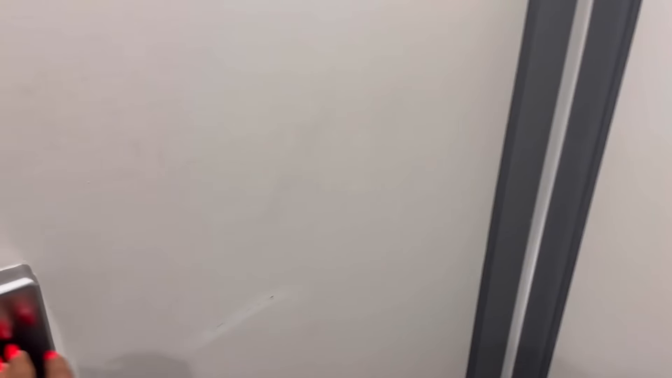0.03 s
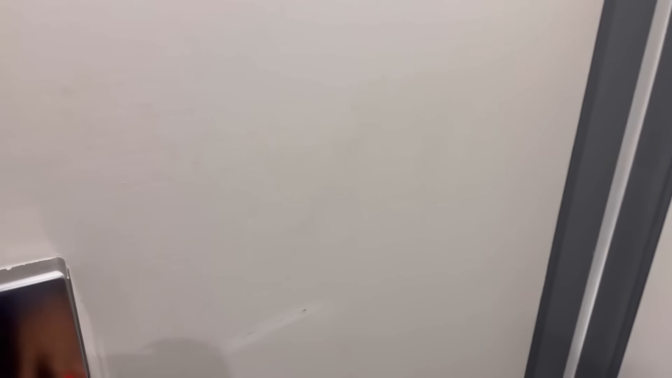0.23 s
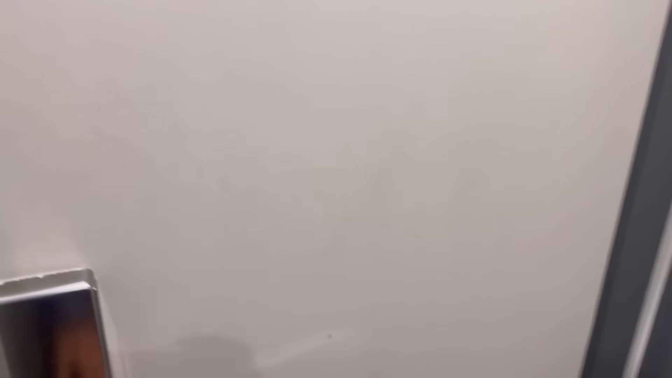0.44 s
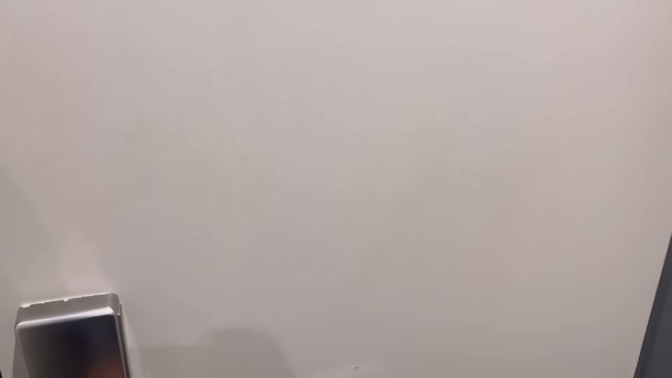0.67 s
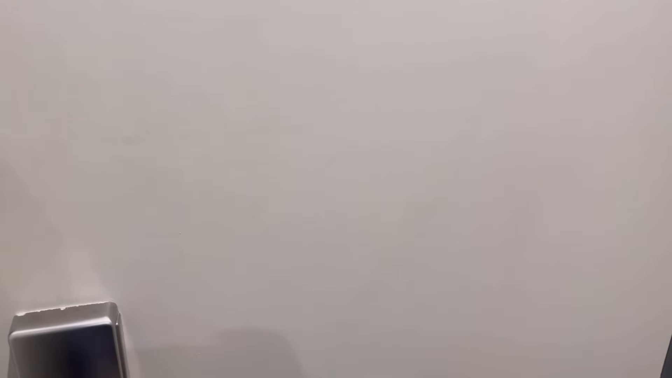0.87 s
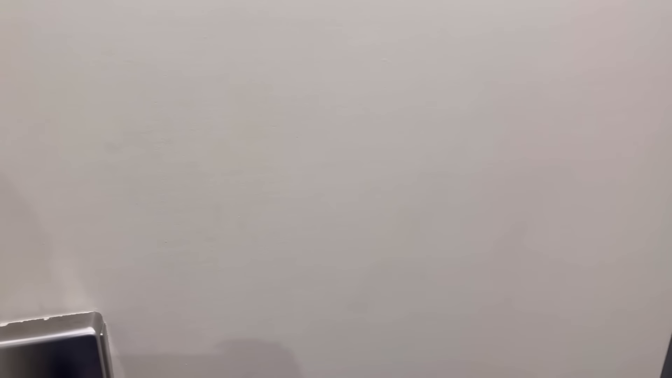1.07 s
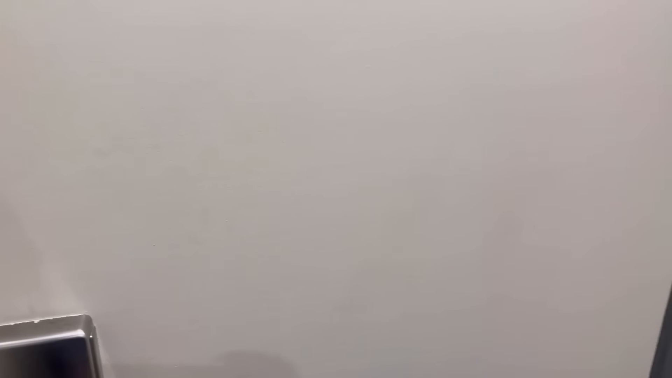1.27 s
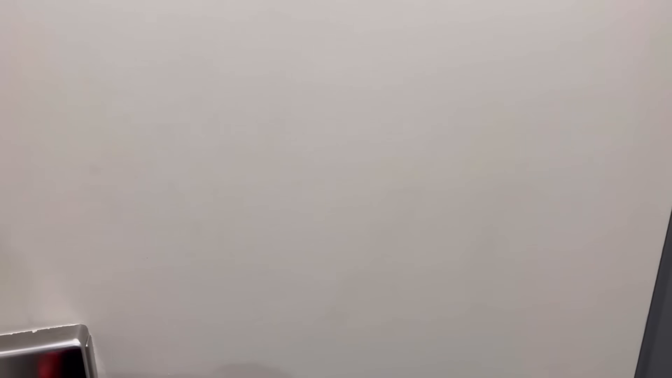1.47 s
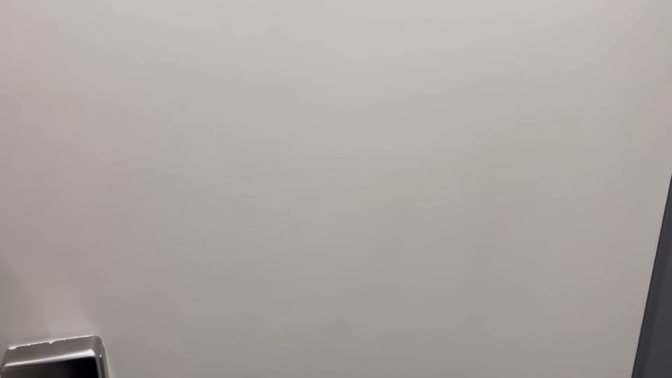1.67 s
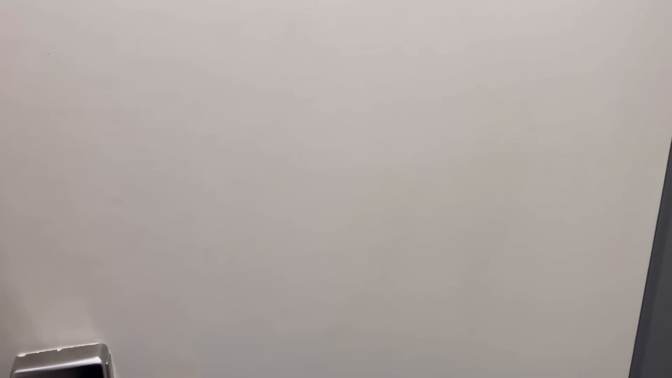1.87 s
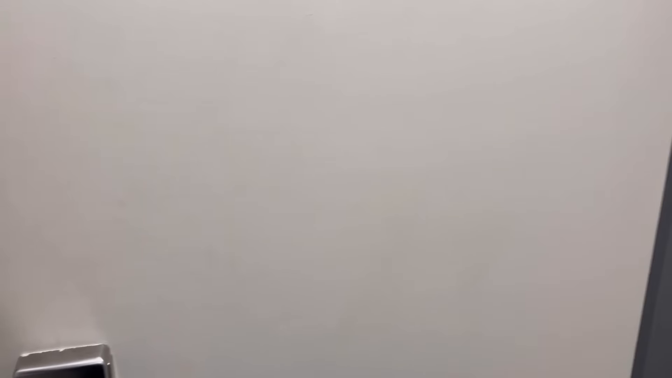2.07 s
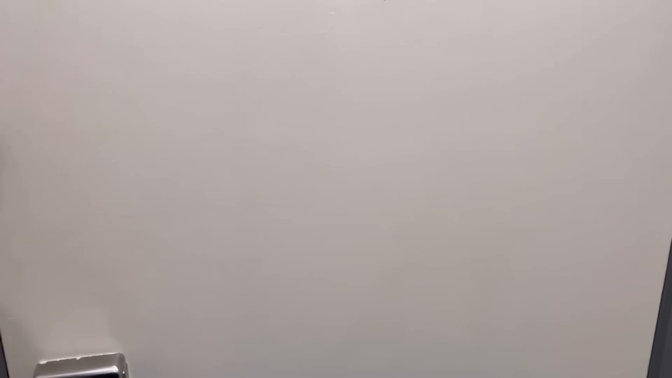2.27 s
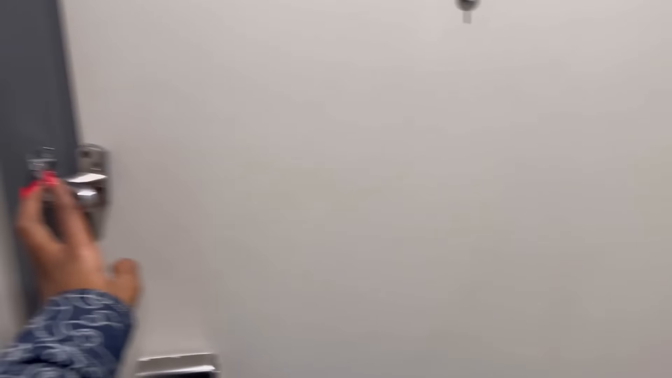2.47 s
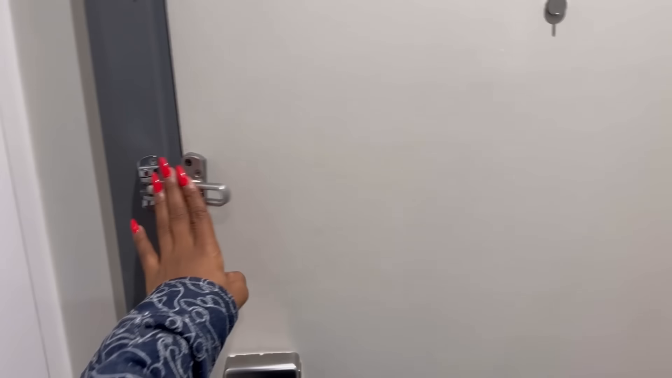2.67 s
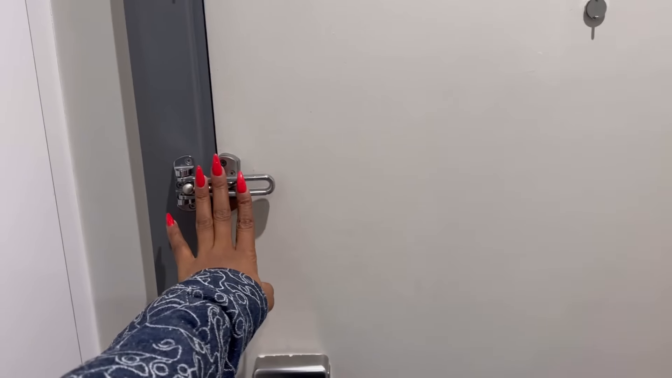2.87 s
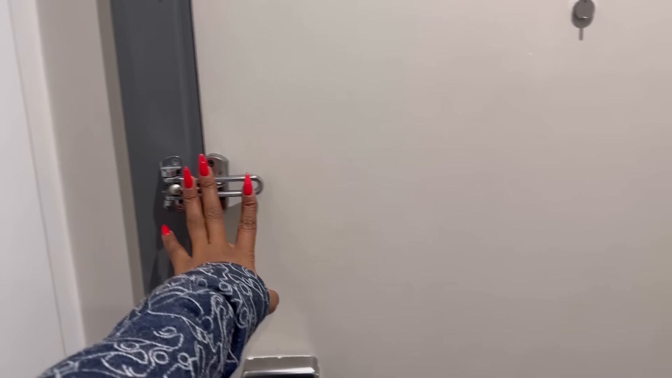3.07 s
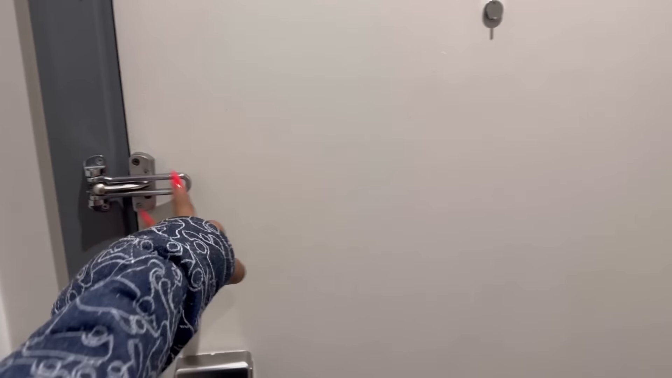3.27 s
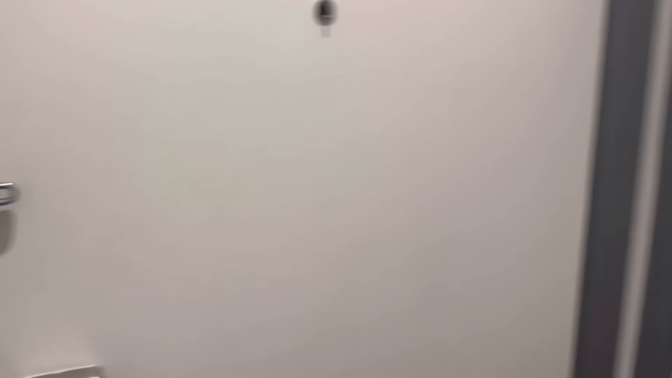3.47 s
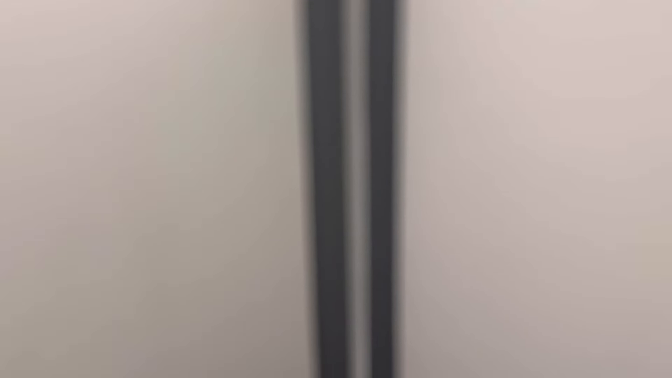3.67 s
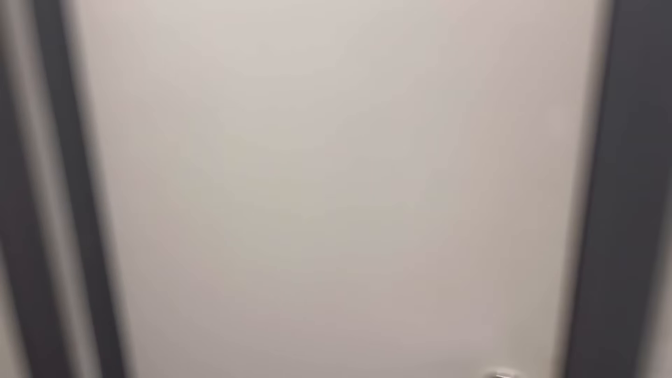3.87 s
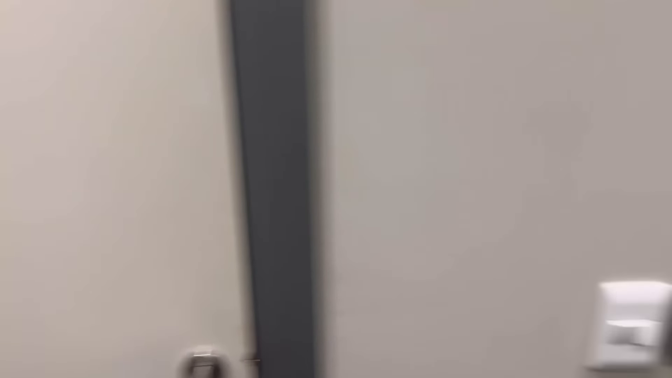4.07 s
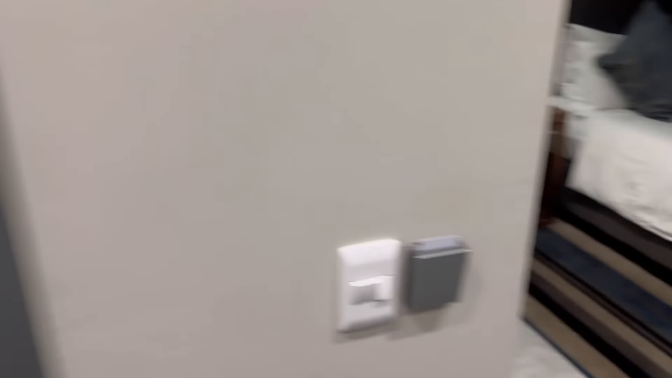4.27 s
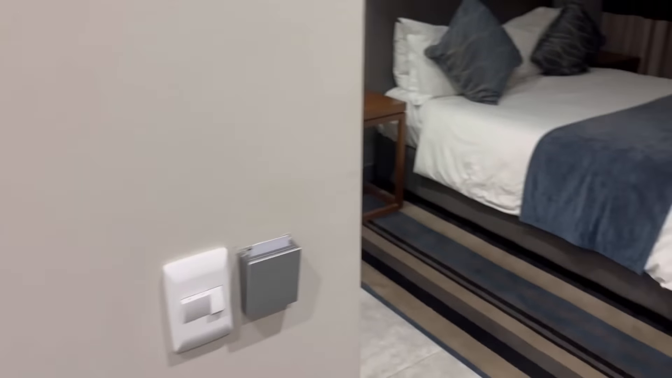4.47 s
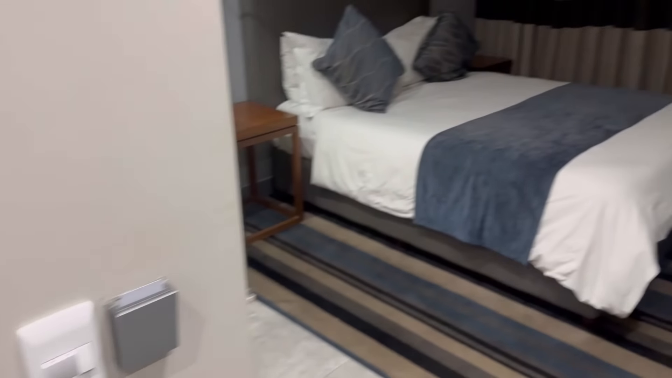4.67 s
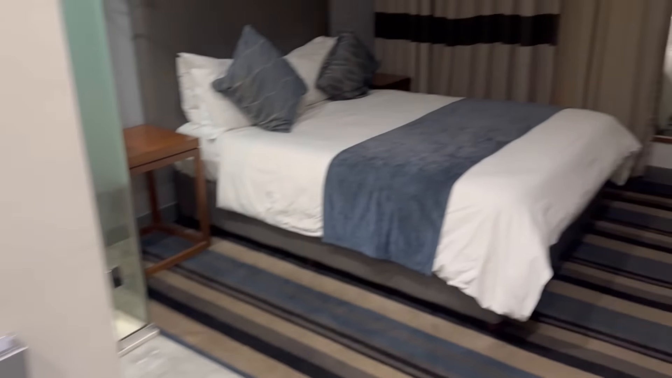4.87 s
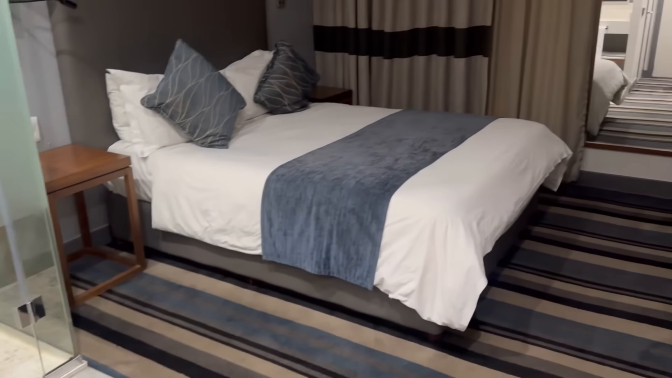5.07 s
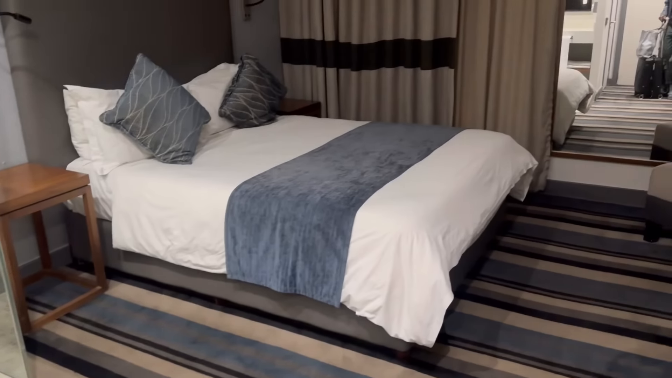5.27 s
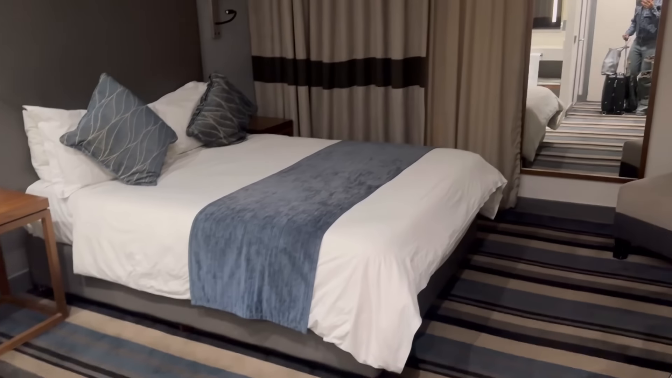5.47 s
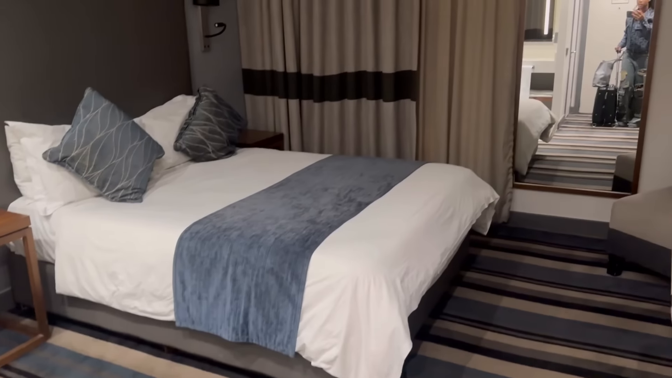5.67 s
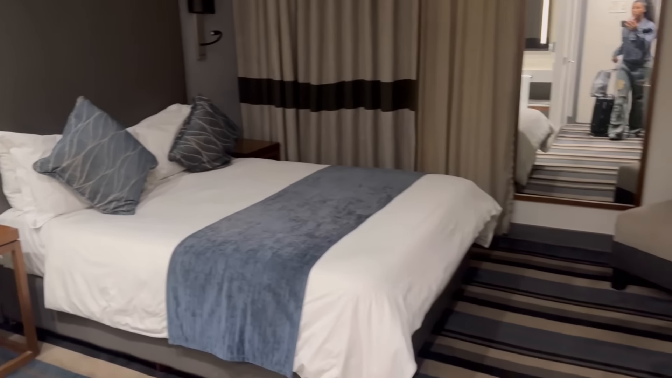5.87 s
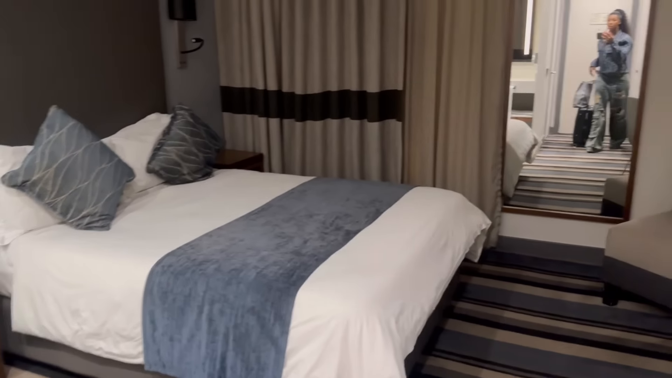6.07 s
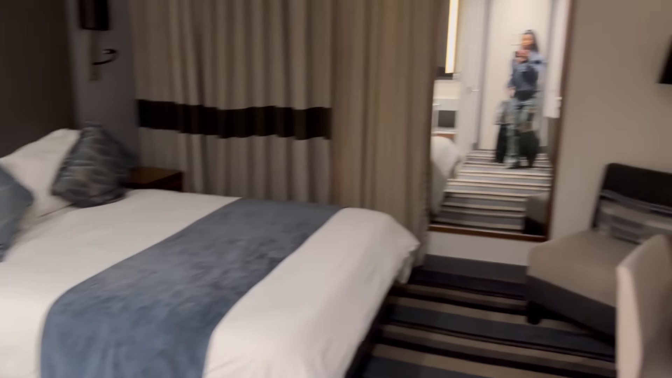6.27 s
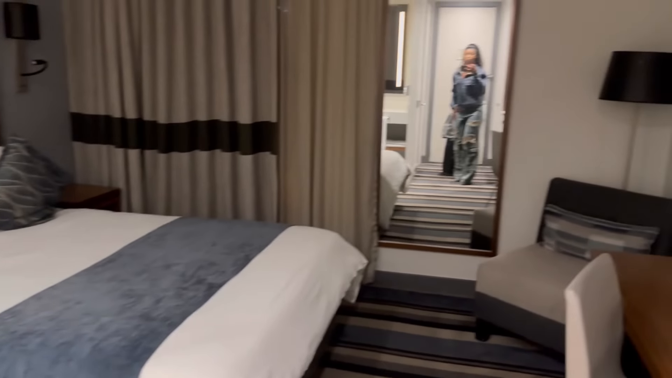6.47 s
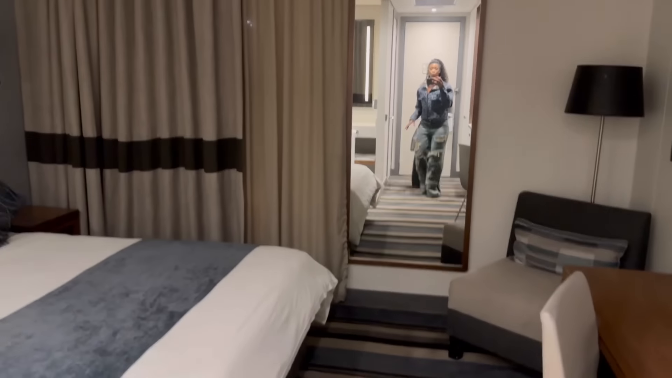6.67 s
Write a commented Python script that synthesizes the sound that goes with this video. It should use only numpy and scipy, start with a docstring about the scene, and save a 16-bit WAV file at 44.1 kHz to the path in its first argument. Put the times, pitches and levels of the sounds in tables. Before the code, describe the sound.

Close to a phone in a small hard entrance passage, a latch snaps sharply, then a heavy room door slams with a deep boom, knocks and rattling metal. Scuffs and rumble settle, thin hinge squeaks chirp, and a metal swing guard knocks and clicks into place. Afterwards it is much quieter: cloth rustle, soft carpet steps, small ticks and a faint wheel whine over steady low air noise.

```python
"""Heavy room door slam

A door latches and slams beside a phone: ticks and knocks are short pushes into banks of metal and door modes.
The leaf booms in one low mode and its latch rattles with it; hinge squeaks are gliding, unsteady tones.
A swing guard is flipped onto its stud. Then soft steps, cloth and a wheeled case move into a carpeted room:
coloured noise swelling with each movement, a faint wheel whine and low hums, over steady air noise."""
import sys
import numpy as np
from scipy import signal
from scipy.fft import rfft, irfft
from scipy.io import wavfile
from scipy.ndimage import uniform_filter1d, map_coordinates

SR = 44100
rng = np.random.default_rng(int(sys.argv[2]) if len(sys.argv) > 2 else 0)


def digitize_waveform(pressure):
    """Quantize a signal to 16-bit integers and store it at the path in sys.argv[1].

    Rows of a 2-D input are taken as channels; values are limited to [-1, 1].
    """
    field = np.atleast_2d(pressure).T
    bounded = np.clip(field, -1, 1)
    quanta = np.round(bounded * 32767).astype(np.int16)
    wavfile.write(sys.argv[1], SR, quanta)


N = 296352
TIME = np.arange(N) / SR
TOP_HZ = 16200


def undb(db):
    """Decibels to gain."""
    return 10 ** (np.asarray(db) / 20)


def unit(x):
    """Scale to rms 1."""
    return x / np.sqrt(np.mean(x ** 2))


def over_hz(table, size):
    """A (freq_hz, value) table read at the bins of a transform, linear in log frequency."""
    hz, value = np.transpose(table)
    bins_hz = np.fft.rfftfreq(size, 1 / SR)
    return np.interp(np.log(bins_hz + 1), np.log(hz), value)


def band(x, centre_hz, ratio, top_hz):
    """Band-pass from centre / ratio to centre * ratio, rms 1."""
    ratio = max(ratio, 1.02)
    edges_hz = [centre_hz / ratio, min(centre_hz * ratio, top_hz)]
    return unit(signal.sosfilt(signal.butter(2, edges_hz, "bandpass", fs=SR, output="sos"), x))


def narrow_noise(hz, width_hz):
    """Noise in a narrow band, rms 1."""
    return band(rng.standard_normal(N), hz, 1 + width_hz / hz / 2, TOP_HZ)


def walk(rate):
    """Random levels held 1 / rate s and slewed twice; rms 1."""
    k = int(SR / rate)
    steps = np.repeat(rng.standard_normal(N // k + 1), k)
    return unit(uniform_filter1d(uniform_filter1d(steps, k), k)[:N])


def swell(start_s, hold_s, attack_s, fade_db_per_s):
    """Linear attack, hold, then a steady fall in dB for 1 s."""
    t = TIME - start_s
    return np.clip(t / attack_s, 0, 1) * undb(-fade_db_per_s * np.clip(t - attack_s - hold_s, 0, 1))


def tone(hz, gain, overtones_db, waver, rough_db, rate):
    """A self-excited ring, unsteady in pitch and level; its overtones grow with its strength."""
    phase = 2 * np.pi * np.cumsum(hz * (1 + waver * walk(rate))) / SR
    overtones = sum(undb(db) * np.sin((k + 2) * phase) for k, db in enumerate(overtones_db))
    wave = np.sin(phase) + gain / gain.max() * overtones
    return np.sqrt(2) * wave * gain * undb(rough_db * walk(rate))


# left-right likeness of spread noise: freq_hz, correlation
LIKENESS = [(60, 1), (300, 0.86), (700, 0.1), (3000, .05)]


def spread_noise(spectrum):
    """Two-channel noise of a given colour, alike in the bass and nearly unrelated in the treble."""
    like = np.clip(over_hz(LIKENESS, N), 0, .99)
    white = rfft(rng.standard_normal((2, N)))
    mid, side = white * undb(over_hz(spectrum, N)) * np.sqrt([1 + like, 1 - like])
    return unit(irfft(np.array([mid + side, mid - side]), N))


# air noise colour: freq_hz, density_db (per Hz)
AIR_COLOUR = [(18, -42), (30, -16.5), (84, 1.5), (512, -12.5), (649, -13), (6050, -28.5), (8980, -44),
              (10800, -55), (14400, -53), (16000, -58.5)]
AIR_DB = -60.5


def air():
    """Steady broadband noise, strongest in the bass."""
    return undb(AIR_DB) * spread_noise(AIR_COLOUR)


# low hums while the door, the feet and the phone move: start_s, hold_s, pitch_hz, level_db
HUMS = [(0.21, 0.0064, 71.09, -34), (0.292, 0.0062, 85.6, -40), (0.486, 0.211, 50.56, -35),
        (0.524, 0.0385, 119.5, -31), (3.203, 1.152, 58.48, -56), (5.198, .01, 141.6, -48),
        (6.418, .05, 295, -54), (6.556, .01, 125, -50.5)]
HUM_ATTACK_S, HUM_FADE_DB_PER_S = 0.02, 250


def hums():
    """Pure low tones swell, waver and fade."""
    out = 0
    for start_s, hold_s, pitch_hz, level_db in HUMS:
        gain = undb(level_db) * swell(start_s, hold_s, HUM_ATTACK_S, HUM_FADE_DB_PER_S)
        out = out + tone(pitch_hz, gain, [], waver=.03, rough_db=1.5, rate=15)
    return out


WHEEL_S, WHEEL_ATTACK_S, WHEEL_HOLD_S, WHEEL_FADE_DB_PER_S, WHEEL_DB = 4.26, .06, .3, 20., -58.5
WHEEL_START_HZ, WHEEL_TOP_HZ, WHEEL_GATHER_S = 490, 700, .6


def case_wheel():
    """A case wheel whines faintly, rising as it gathers speed."""
    rolling = undb(WHEEL_DB) * swell(WHEEL_S, WHEEL_HOLD_S, WHEEL_ATTACK_S, WHEEL_FADE_DB_PER_S)
    lag = np.exp(-np.clip(TIME - WHEEL_S, 0, 9) / WHEEL_GATHER_S)
    pitch_hz = WHEEL_TOP_HZ - (WHEEL_TOP_HZ - WHEEL_START_HZ) * lag
    return tone(pitch_hz, rolling, [-30., -18.], waver=.07, rough_db=4., rate=250)


# noise colours: freq_hz, density_db (per Hz)
CLOTH = [(1060, -34.5), (1800, 2), (3200, 1), (8210, -3), (10100, -10.5), (11300, -30), (14500, -24.5),
         (16000, -26)]
SWISH = [(410, -31.5), (700, -5.5), (766, -11.5), (1010, -2), (1110, 1), (2300, -14), (2990, -39),
         (5060, -120)]
SCUFF = [(65, -38), (110, -5), (145, -0.5), (265, -6.5), (303, -2.5), (800, -14), (1040, -44), (1760, -120)]
RUMBLE = [(12, -39.5), (20, -8.5), (39, -9), (59, 4), (95, -6.5), (109, -0.5), (130, -20), (170, -38.5),
          (290, -120)]
# resonances the scuffing excites: freq_hz, width_hz, level_db
HOLLOW = [(355, 40, -11), (550, 50, -12.5)]
# movements of the person and the settling door: peak_s, time_per_6_db_s, cloth_db, swish_db, scuff_db
MOVES = [(.2, 0.8542, -68, -65.5, -53.5), (1.0, 0.1028, -52.5, -45.5, -36.5),
         (1.24, 0.0951, -60, -52, -37.5), (1.72, 0.0925, -62.5, -63.5, -53.5), (2.2, 0.1545, -65, -73, -50),
         (2.48, 0.138, -66.5, -67.5, -53), (3.46, 0.19, -67.5, -68.5, -57.5),
         (3.655, 0.04, -71.5, -59, -60.5), (4.12, 0.0051, -57.5, -61.5, -57.5),
         (4.27, 0.073, -62.5, -62, -59), (4.64, 0.13, -62, -62, -54.5), (5.05, 0.53, -68.5, -68, -59),
         (5.47, 0.04, -59, -60, -53), (5.59, 0.04, -86, -57, -60), (5.7, .015, -56, -66, -58),
         (5.775, 0.035, -55, -60, -58.5), (5.984, 0.0392, -57, -59.5, -55), (6.501, 0.045, -58.5, -52, -47)]
# low rumble of the settling door and the moving person: time_s, level_db
RUMBLE_LEVEL = [(0, -48), (.76, -46), (.84, -29.5), (1.0, -24.5), (1.27, -32), (1.41, -37), (1.82, -45),
                (2.04, -59.5), (2.6, -56.5), (2.98, -44), (3.25, -53.5), (4.06, -60.5), (4.4, -64),
                (5.7, -63), (6.2, -72.5), (6.72, -62.5)]
FOOTFALL_DB = -9  # rumble of each movement, re its scuffing
AIRY_HZ, AIRY_WIDTH_HZ, AIRY_DB = 1600, 180, -5  # joins the swish once the case rolls


def movements():
    """Cloth crackles in fine grains and swishes, soles scuff the carpet, a low rumble swells and fades."""
    peak_s, fall_s, cloth_db, swish_db, scuff_db = np.transpose(MOVES)[:, :, None]
    power = .25 ** (np.abs(TIME - peak_s) / fall_s)

    def moving(level_db):
        """Power sum of all movements, as a gain."""
        return np.sqrt((undb(level_db) ** 2 * power).sum(axis=0))

    grain = walk(60)  # shared by swish and scuff
    cloth = spread_noise(CLOTH) * moving(cloth_db) * undb(2.2 * walk(30) + 3.2 * walk(400))
    airy = undb(AIRY_DB) * (TIME > WHEEL_S) * narrow_noise(AIRY_HZ, AIRY_WIDTH_HZ)
    swish = (spread_noise(SWISH) + airy) * moving(swish_db) * undb(1.2 * grain + 1.5 * walk(40))
    hollow = sum(undb(db) * narrow_noise(hz, width_hz) for hz, width_hz, db in HOLLOW)
    scuff = (spread_noise(SCUFF) + hollow) * moving(scuff_db) * undb(0.49 * grain + 2.1 * walk(25))
    slow_gain = undb(np.interp(TIME, *np.transpose(RUMBLE_LEVEL)))
    rumble_gain = np.hypot(slow_gain, moving(scuff_db + FOOTFALL_DB))
    rumble = spread_noise(RUMBLE) * rumble_gain * undb(2 * walk(10))
    return cloth + swish + scuff + rumble


# passage decay: freq_hz, t60_s
ROOM_T60 = [(100, 0.48), (500, 0.24), (2000, 0.3143), (8000, 0.15), (15000, 0.05)]
ROOM_DB, ROOM_ONSET_S = -7, 0.0075


def room(x):
    """Dense echoes of the entrance passage: noise decaying band by band, fastest in the top treble."""
    t = np.arange(SR // 2) / SR
    noise = rfft(rng.standard_normal((2, len(t))))
    octave = np.log2(np.fft.rfftfreq(len(t), 1 / SR) + 1)
    table_hz, table_t60_s = np.transpose(ROOM_T60)
    tail = 0
    for hz in 100 * 2. ** np.arange(8):
        t60_s = np.interp(np.log(hz), np.log(table_hz), table_t60_s)
        share = np.clip(1 - np.abs(octave - np.log2(hz)), 0, 1)
        tail = tail + irfft(noise * share, len(t)) * np.exp(-np.log(1000) * t / t60_s)
    tail = tail * np.clip(t / ROOM_ONSET_S, 0, 1)
    tail = tail / np.sqrt(np.mean(np.sum(tail ** 2, axis=1)))
    return undb(ROOM_DB) * signal.fftconvolve(x[None], tail, axes=1)[:, :N]


# hinge squeaks: start_s, attack_s, hold_s, first_hz, last_hz, level_db, waver_share, flutter_db
SQUEAKS = [(1.856, 0.00676, 0.0173, 7084, 7164, -39.5, 0.00377, 5),
           (1.943, 0.0098, 0.02, 7600, 7560, -40, 0.0017, 2),
           (1.973, 0.0404, 0.0463, 7540, 7644, -36.5, 0.00078, 1),
           (2.076, 0.0077, 0.09, 7480, 7400, -54, 0.011, 6),
           (2.124, 0.0427, 0.0114, 2346, 2420, -50, 0.017, 4),
           (2.164, 0.0192, .0005, 2408, 2550, -29.5, 0.0036, 2),
           (2.187, 0.0035, 0.00444, 2622, 2545, -35, .04, 4.5),
           (2.194, .003, .025, 2329, 2302, -42, .03, 2.5), (2.198, .003, 0.02, 2700, 2626, -46.5, .03, 2.5),
           (2.338, 0.0241, 0.0321, 2623, 2783, -34.5, 0.00384, 0),
           (2.398, 0.0055, 0.0062, 2777, 2800, -38, 0.002804, 1.5),
           (2.608, 0.00895, .035, 3300, 3420, -52, 0.0073, 3.5)]
SQUEAK_OVERTONES_DB, SQUEAK_FULL_DB = [-12.5, -26.5], -38.5  # overtones at this level; weaker is purer
SQUEAK_FADE_DB_PER_S, SQUEAK_TAIL_DB, SQUEAK_TAIL_DB_PER_S = 1200, -15.5, 200.5
SQUEAK_GLIDE_ON_S = .03  # glide outlasts the hold


def hinge():
    """Each squeak swells and glides while it holds, breaks off and trails away faintly."""
    out = 0
    for start_s, attack_s, hold_s, first_hz, last_hz, level_db, waver, flutter_db in SQUEAKS:
        glide_end_s = start_s + attack_s + hold_s + SQUEAK_GLIDE_ON_S
        pitch_hz = np.interp(TIME, [start_s, glide_end_s], [first_hz, last_hz])
        body = swell(start_s, hold_s, attack_s, SQUEAK_FADE_DB_PER_S) ** 2
        tail = undb(SQUEAK_TAIL_DB) * swell(start_s, hold_s, attack_s, SQUEAK_TAIL_DB_PER_S)
        gain = undb(level_db) * np.maximum(body, tail)
        overtones_db = np.add(SQUEAK_OVERTONES_DB, (level_db - SQUEAK_FULL_DB) / 2)
        out = out + tone(pitch_hz, gain, overtones_db, waver, flutter_db, rate=300)
    return out


# swells of the leaf's low boom, by slam, its pulsing after-boom and guard:
# start_s, hold_s, pitch_hz, level_db
BOOM = [(0.815, 0.0126, 77.14, -9.5), (0.855, 0.0934, 71.06, -9.5), (0.998, 0.146, 68.5, -23),
        (1.208, 0.0085, 73.28, -19), (1.28, 0.012, 75.3, -19), (1.332, 0.0089, 75.35, -20),
        (1.565, 0.042, 72.95, -36.5), (1.717, 0.0076, 68.31, -33.5), (1.803, 0.103, 73.94, -47.5),
        (2.811, 0.0091, 74.09, -30.5), (2.919, 0.0667, 75.16, -35)]
BOOM_ATTACK_S, BOOM_FADE_DB_PER_S = 0.017, 189.5


def leaf():
    """One low mode swells again and again; its pitch leans to the strongest swell."""
    gains = np.array([undb(level_db) * swell(start_s, hold_s, BOOM_ATTACK_S, BOOM_FADE_DB_PER_S)
                      for start_s, hold_s, _, level_db in BOOM]) + 1e-12
    pitch_hz = np.array(BOOM)[:, 2] @ gains / gains.sum(axis=0)
    return tone(pitch_hz, gains.max(axis=0), [-26.], waver=0.011, rough_db=1.0, rate=30)


RATTLE_PER_S, RATTLE_DB, RATTLE_CLICK_S = 170, -35, 0.004


def rattle(boom):
    """The shaking leaf makes the loose latch chatter: random short clicks, as strong as the shaking."""
    where, size = rng.random(N), rng.exponential(size=N)
    clicks = (where < RATTLE_PER_S / SR) * undb(5.6 * np.minimum(size, 4))
    envelope = signal.lfilter([1], [1, -np.exp(-1 / (RATTLE_CLICK_S * SR))], clicks)
    bursts = envelope * rng.standard_normal(N)
    shaking = uniform_filter1d(np.abs(boom), 600)
    return undb(RATTLE_DB) * band(bursts, 1800., 8.3, TOP_HZ) * shaking


def blows(table, modes, rise_s, focus_oct, own_db, crack_db, crack_ratio, edge_db_up, edge_ratio,
          edge_pitch, ring_share, linger, own_damp, edge_damp):
    """Each blow is a short rough push into the body's modes; where it lands favours those near one pitch."""
    size = 16384
    out = np.zeros((2, N + size))
    t = np.arange(size) / SR
    rise = (1 - np.exp(-t / max(rise_s, 1e-4))) ** 2
    mode_hz, width_hz, mode_db = np.transpose(modes)[:, :, None]
    for start_s, peak_db, centre_hz, t60_s, pan_db, edge_db, edge_hz in table:
        chance_level, chance_pitch = rng.standard_normal((2, len(modes), 1))
        favour_db = -10 * np.minimum((np.log2(mode_hz / centre_hz) / focus_oct) ** 2, 2)
        fade = np.exp(-np.log(1000) * t / max(t60_s, .008))
        rings = np.sin(2 * np.pi * mode_hz * (1 + 0.0034 * chance_pitch) * t)
        rings = rings * undb(mode_db + favour_db + 2 * chance_level)
        ring = (rings * np.exp(-ring_share * np.pi * width_hz * t)).sum(axis=0)
        own = undb(own_db) * np.sin(2 * np.pi * centre_hz * t) * fade ** own_damp
        noise = rng.standard_normal(size)
        crack = undb(crack_db) * band(noise, centre_hz, crack_ratio, 10500.)
        edge = edge_pitch * np.sin(2 * np.pi * edge_hz * t) + band(noise, edge_hz, edge_ratio, TOP_HZ)
        edge = undb(edge_db + edge_db_up) * edge * fade ** edge_damp
        # part of the ring outlasts the contact
        hit = ((ring + own + crack + edge) * fade + linger * ring) * rise
        i = int(start_s * SR)
        ports_db = peak_db + np.array([[pan_db], [-pan_db]]) / 2
        out[:, i:i + size] += hit / np.abs(hit).max() * undb(ports_db)
    return out[:, :N]


# ticks of latch, guard and case: start_s, peak_db, brightest_hz, left_minus_right_db, sizzle_db
TICKS = [(.201, -43.5, 6000, 3, -11.5), (0.4758, -34, 4400, 0, -24), (0.5161, -3.5, 8426, 4, -41),
         (0.5191, -12.5, 2714, -10.5, -40), (0.5346, -14, 7160, 8.5, -29.5), (.677, -43, 6540, 2.5, -26.5),
         (.8104, -26, 2392, 3, -34.5), (0.8215, -20, 5000, 9.5, -25.5), (0.8314, -10.5, 6852, 11.5, -34),
         (.8385, -15.5, 6430, 4.5, -33), (.8445, -14, 2410, 2.5, -30.5), (0.8647, -17.5, 4140, -11, -32.5),
         (.8545, -19, 2900, 0, -33), (.883, -17, 2420, 1.5, -33.5), (.9644, -27, 2296, 11, -35.5),
         (.9744, -30.5, 3018, -10, -28), (1.045, -36.5, 6520, 0.5, -32.5), (1.0929, -30.5, 3595, 6, -30.5),
         (1.189, -42, 2508, -1.5, -29.5), (1.2636, -30, 2224, 5, -34.5), (1.2783, -34.5, 2724, 13, -34.5),
         (1.3025, -31, 2220, -9, -32), (1.675, -38, 6873, 0.5, -30.5), (1.7008, -39.5, 3870, -2.5, -19.5),
         (1.7184, -32.5, 5870, 13, -27), (1.8557, -27.5, 6970, 8, -14), (1.8994, -42, 7240, 2, -3),
         (2.1825, -33.5, 5000, 5, -34.5), (2.2548, -44.5, 3950, 0, -40.5), (2.3122, -23.5, 3056, 0.5, -28),
         (2.7852, -26.5, 4460, -9, -25), (2.790, -21.5, 3457, -9.5, -23), (2.824, -21.5, 6834, 5.5, -33),
         (2.8767, -29, 4300, 6, -27.5), (2.883, -33.5, 2700, 13, -23), (3.2574, -38, 9640, -9.5, -6),
         (3.2655, -30.5, 8100, 11, -8.5), (3.2695, -38, 6000, 0, -13.5), (3.2789, -29, 7672, 10.5, -16),
         (3.2895, -26.5, 3670, -3, 12.5), (3.302, -31.5, 8800, -9.5, -14.5),
         (3.509, -40.5, 2348, -4.5, -44.5), (3.566, -44, 2600, -1.5, -40.5), (3.7697, -40, 7300, 5.5, -29),
         (4.072, -45, 6000, -0.5, -28), (4.087, -39.5, 3443, 6.5, -27), (4.1272, -44.5, 4530, 0.5, -27),
         (4.1537, -45.5, 4960, 3.5, -27), (4.1725, -44.5, 3250, 4, -30.5), (4.1912, -45, 5760, 9, -24),
         (4.241, -32, 8510, 4.5, -31), (4.5483, -28.5, 5313, 7.5, -31), (4.5734, -36.5, 3560, -6, -24.5),
         (5.4125, -38, 2400, -10, -39.5), (5.4215, -37, 4200, -5, -36), (5.444, -43, 5700, 1, -34),
         (5.6485, -47, 1850, -2.5, -33), (5.6871, -37, 4510, 0.5, -34), (5.7628, -36, 2650, -1.5, -40.5),
         (6.1035, -47, 3020, 2, -35.5)]
# metal modes: freq_hz, width_hz, level_db
METAL = [(2178, 26, 2), (2970, 53, -13.5), (4600, 51, -30), (5500, 110, -14.5), (5990, 30, -8.5),
         (6746, 39, 1.5), (7163, 120, -4), (8200, 35, -18.5), (7710, 27, -24.5), (8573, 76, 3.5),
         (9960, 14, -7.5), (13310, 37, -22)]
TICK_T60_S, SIZZLE_HZ = .03, 14300


def metal_ticks():
    """Small hard contacts ring metal modes, with a high sizzle of noise."""
    table = [(start_s, peak_db, brightest_hz, TICK_T60_S, pan_db, sizzle_db, SIZZLE_HZ)
             for start_s, peak_db, brightest_hz, pan_db, sizzle_db in TICKS]
    return blows(table, METAL, rise_s=0.0007, focus_oct=0.66, own_db=-1.5, crack_db=2.0, crack_ratio=2.05,
                 edge_db_up=9.2, edge_ratio=1.13, edge_pitch=0, ring_share=1.4, linger=.006,
                 own_damp=.8, edge_damp=.51)


# knocks on door, frame and floor:
# start_s, peak_db, strongest_hz, t60_s, left_minus_right_db, hard_edge_db, edge_hz
KNOCKS = [(0.518, -7.5, 459.9, 0.0614, 12.5, -40, 784), (0.8085, -3, 400.6, 0.035, -3, -4, 1376),
          (.817, -8.5, 706, 0.13, 0.5, -18, 498), (0.829, -10, 480, 0.09, 10.5, -7.5, 743),
          (.844, -12, 308.7, 0.072, 11, -5.5, 780.6), (0.86, -7, 173.3, 0.041, 8.5, -2.5, 804),
          (.8675, -10, 417, .05, 3.5, -1, 1347), (.912, -20.5, 429, 0.052, -1, -15, 913),
          (0.889, -19, 174.3, 0.117, 15, -14.5, 785), (0.979, -20, 165.4, 0.087, 4, -13, 1016),
          (1.261, -24, 154.2, 0.194, 1, -10.5, 1230), (1.305, -20, 535.7, 0.0378, 5, -3.5, 741.7),
          (1.739, -36.5, 347.4, 0.062, -1, -16.5, 1137), (1.82, -39, 375.6, 0.063, 0.5, -37, 770),
          (2.182, -38, 362.2, 0.099, 1, -9, 1798), (2.314, -23.5, 569, 0.067, 9.5, -5, 1173),
          (2.328, -29, 325.7, 0.075, 0, -10, 1137), (2.498, -33, 160, 0.0463, 2, -4, 519),
          (2.787, -22.5, 300, 0.0455, 10, -10, 1260), (2.7915, -8.5, 310, 0.085, 3, -20, 1234),
          (2.8185, -22, 200, 0.05, -2.5, -5.5, 1174), (2.86, -29, 150, .03, 0, -20, 900),
          (2.877, -27, 773, .04, 10.5, -4, 1469), (2.885, -22.5, 557.3, 0.0438, 12.5, -9.5, 1207),
          (3.234, -43, 250, .06, 2, -21.5, 900), (3.270, -31, 305, 0.0524, 5, -8, 1299),
          (3.2705, -29, 1270, 0.1, 2.5, -18, 1260), (3.2975, -29, 320, 0.1, 1.5, -21.5, 1260),
          (3.484, -46, 700, .03, 0, -3, 1300), (3.508, -42, 600, 0.03, 0, 0.5, 1100),
          (3.523, -45, 1500, .03, 0, -6, 900), (3.564, -38, 480, 0.04, -3, 0, 1100),
          (3.601, -47, 1400, .03, 0, -8, 2400), (4.085, -41, 184, 0.095, 1.5, 3, 939.7),
          (4.129, -43.5, 641, 0.051, 0.5, 1, 868), (4.1725, -39, 487, 0.037, -0.5, -2.5, 751),
          (4.309, -45, 514.7, 0.091, 6, -2.5, 1094), (4.574, -24.5, 460.3, 0.0326, 3, -1, 883),
          (4.599, -39, 152, 0.06, -1, -23, 916), (4.712, -43, 330, .06, 0, -14, 800),
          (4.916, -44.5, 355, 0.078, 0.5, -28.5, 920), (5.228, -37.5, 154, 0.097, 1, -7.5, 816.7),
          (5.4125, -38, 2350, 0.05, -5.5, -4, 2600), (5.464, -38, 300, 0.07, 3, -8, 1200),
          (5.487, -41, 250, .07, 0, -6, 1500), (6.097, -49.5, 207, 0.086, -1.5, -12, 920),
          (6.49, -44, 301, 0.165, -1, -3.5, 905)]
# door modes: freq_hz, width_hz, level_db
DOOR = [(122, 9.2, -3), (189.2, 4.3, -4.5), (275.93, 25, 2), (355.2, 22, -2), (427.6, 23, -1.5),
        (492.55, 11, -3.5), (602.3, 15, -5.5), (636, 16, -11.5), (723, 60, -4.5), (771, 16, -6.5),
        (825, 48, -18.5), (914, 70, -12.5), (1233, 27, -2), (1339, 18, -6), (1520, 25, -8)]


def door_knocks():
    """Heavy contacts ring the door's modes, with a harder pitched edge."""
    return blows(KNOCKS, DOOR, rise_s=0.0019, focus_oct=0.988, own_db=3.3, crack_db=-2.5, crack_ratio=3.03,
                 edge_db_up=2.8, edge_ratio=1.2, edge_pitch=1.6, ring_share=.8, linger=.08,
                 own_damp=.05, edge_damp=.6)


# right port lag, less once the phone turns from the door: time_s, lag_s
PORT_LAG = [(3.3, .00025), (3.6, 0.0001216)]
CARPET_S, CARPET_DB = 3.4, -2  # weaker echoes past the passage
SQUEAK_ECHO_DB = -7.0


def scene():
    """Door and guard reach both ports directly and through the room; the lows and spread sounds join them."""
    boom = leaf()
    near = metal_ticks() + door_knocks() + rattle(boom)
    squeaks = hinge()
    # door off to the left: the right port hears it a little later
    lag_s = np.interp(TIME, *np.transpose(PORT_LAG))
    left = near[0] + squeaks
    right = map_coordinates(near[1] + squeaks, [(TIME - lag_s) * SR], mode="nearest")
    direct = np.array([left, right])
    to_room = near.mean(axis=0) + undb(SQUEAK_ECHO_DB) * squeaks
    echoes = room(to_room * undb(CARPET_DB * (TIME > CARPET_S)))
    return air() + hums() + case_wheel() + movements() + echoes + boom + direct


# overall treble colour: freq_hz, gain_db
TREBLE_COLOUR = [(9000, 1), (10300, -3.5), (11400, -27), (12600, 2), (15500, 3)]


def record(dry):
    """A dip colours the upper treble, the loudest peaks are rounded, the top is cut."""
    coloured = irfft(rfft(dry) * undb(over_hz(TREBLE_COLOUR, N)), N)
    rounded = np.tanh(1.1 * coloured) / 1.1
    return signal.sosfilt(signal.ellip(10, .2, 90, TOP_HZ, fs=SR, output="sos"), rounded)


dry = scene()
out = record(dry)
digitize_waveform(out)
```